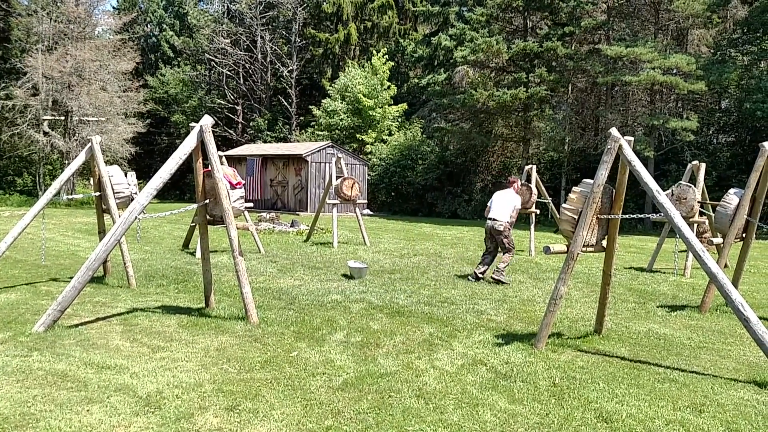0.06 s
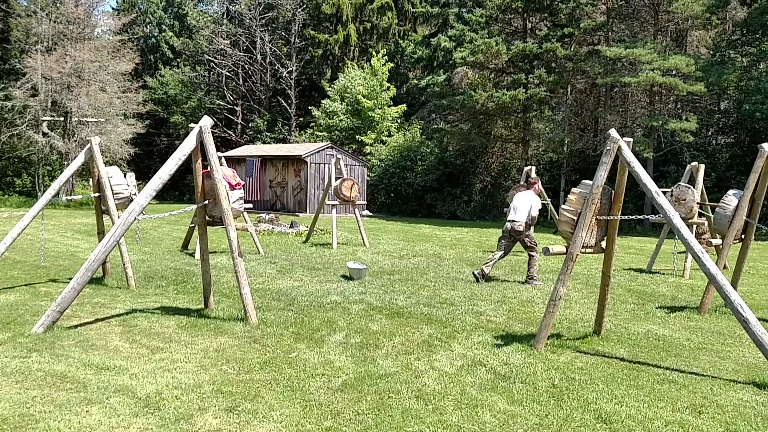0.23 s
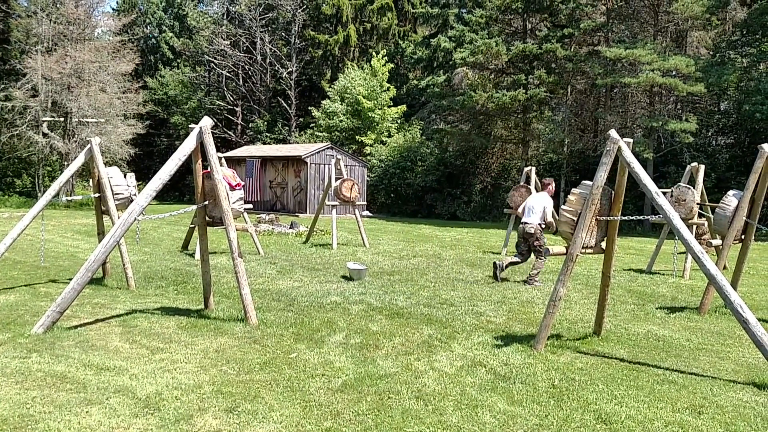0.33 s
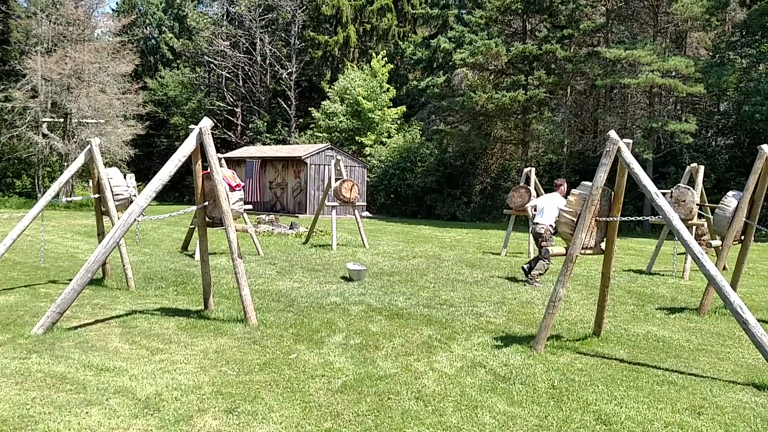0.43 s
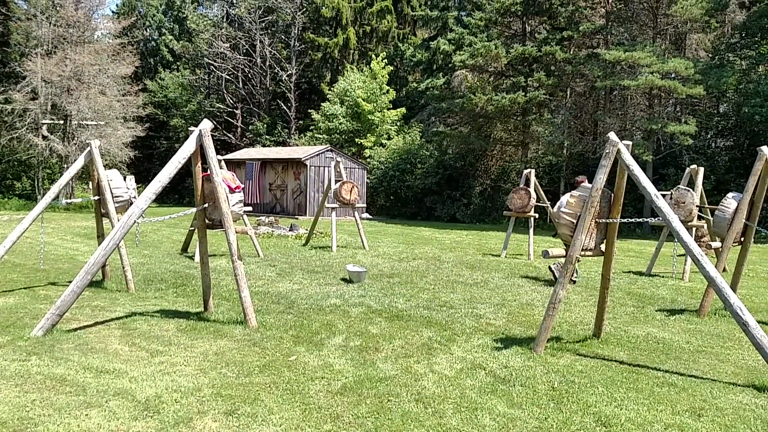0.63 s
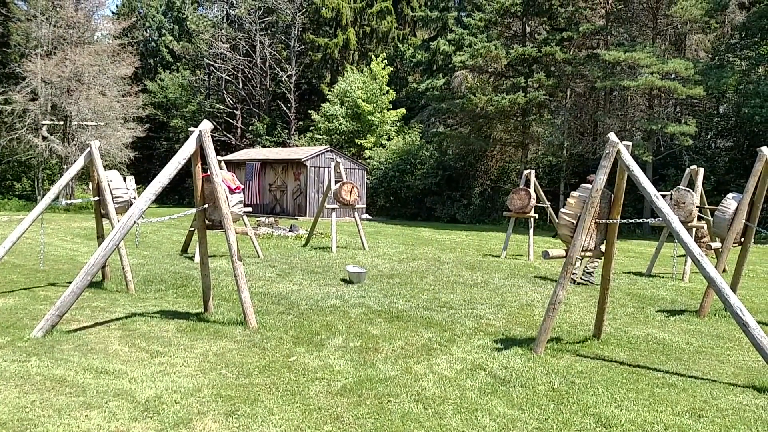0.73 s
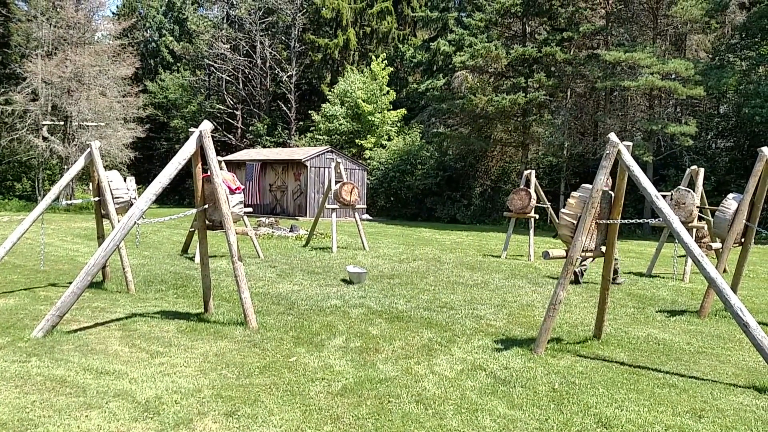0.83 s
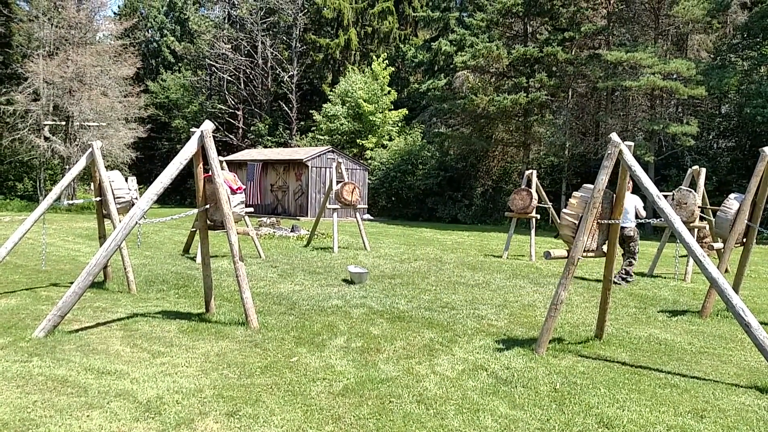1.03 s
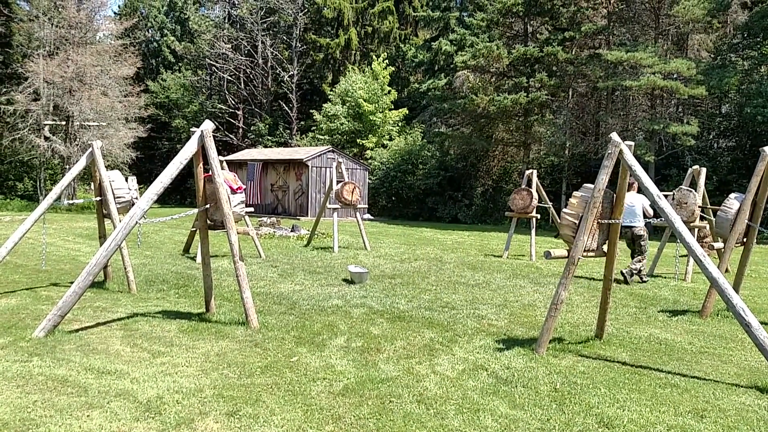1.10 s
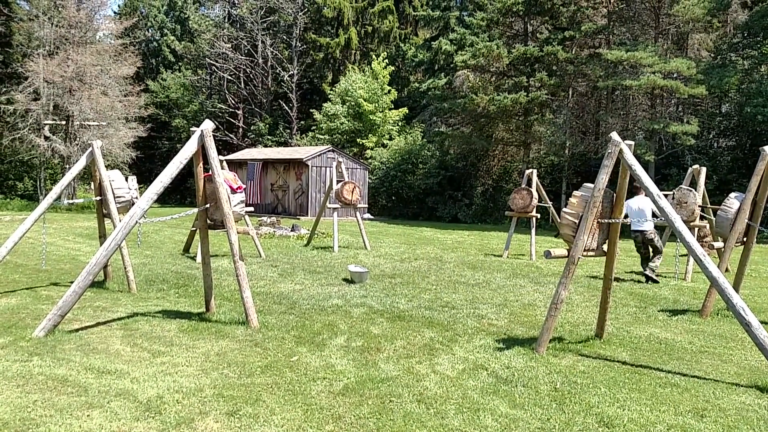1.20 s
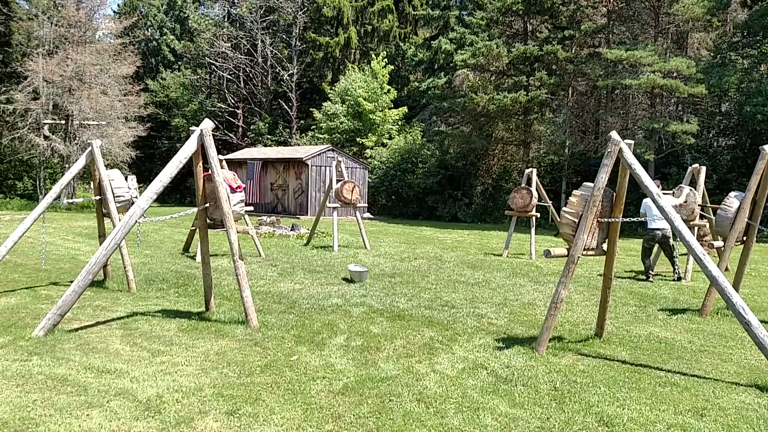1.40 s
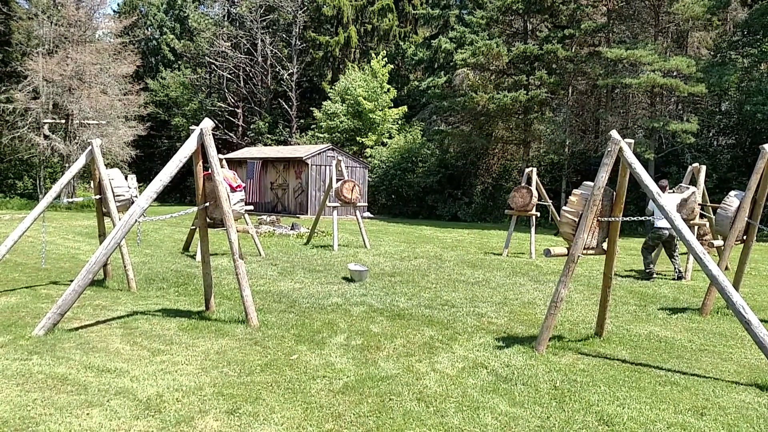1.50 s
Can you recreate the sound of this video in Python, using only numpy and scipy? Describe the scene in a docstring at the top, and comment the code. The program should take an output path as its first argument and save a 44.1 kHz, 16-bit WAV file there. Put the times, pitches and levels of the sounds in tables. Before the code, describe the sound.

Single crisp axe hit on wood in a grassy yard beside woods, splintery and short with a light scattered tail, then a softer low thud; quiet breeze, low rumble and thin insect hiss, distant single-channel microphone.

```python
"""Breeze, far rumble and a thin insect hiss run throughout, as random noise shaped in bands.
A thrown axe bites into a log round some metres away: quick pushes ring the wood's modes, with an edge tick and a snap.
Splintering fibres and then the rattling handle ring the same modes in short noise bursts.
Posts, a shed and trees return the blow as echoes and a scattered tail, by convolution with an impulse response.
Later dull knocks, each a brief swing of pressure: first a faint, inverted far echo of the blow, then low thuds."""
import sys
import numpy as np
from scipy import signal
from scipy.fft import rfft, irfft, next_fast_len
from scipy.io import wavfile
from scipy.ndimage import uniform_filter1d

SR = 44100
rng = np.random.default_rng(int(sys.argv[2]) if len(sys.argv) > 2 else 0)


def wav_out(sig):
    """Save sig, one row per channel (or a flat mono array), as 16-bit PCM at SR to the path in sys.argv[1]."""
    wavfile.write(sys.argv[1], SR, np.round(np.clip(np.atleast_2d(sig).T, -1, 1) * 32767).astype(np.int16))


def nominal_scale(level):
    """Amplitude ratio for a level in decibels (scalar or array-like)."""
    x = np.asarray(level, float) / 20
    return 10 ** x


N = 68355
T = np.arange(N) / SR  # seconds


def convolve(a, b):
    """Linear superposition: convolution by way of spectra, cut to the scene's length."""
    size = next_fast_len(2 * N)
    return irfft(rfft(a, size) * rfft(b, size), size)[:N]


def band(x, hz, octaves):
    """Zero-phase filtering by a bell-shaped gain on a log-frequency axis."""
    f = np.fft.rfftfreq(len(x), 1 / SR) + 1
    gain = np.exp(-2 * (np.log2(f / hz) / octaves) ** 2)
    return irfft(rfft(x) * gain, len(x))


def fade(start, t60):
    """Exponential decay, falling 60 dB in t60 seconds; silent before start."""
    return (T >= start) * np.exp(-np.log(1000) * np.maximum(T - start, 0) / t60)


def rise_and_fade(start, rise, t60):
    """Exponential build-up with time constant rise (s), multiplied by an exponential decay."""
    return fade(start, t60) * (1 - fade(start, rise * np.log(1000)))


def unit(x):
    """Energy normalisation: the squares sum to 1."""
    return x / np.sqrt(np.sum(x ** 2))


def walk(rate):
    """Slow random modulation: levels held 1 / rate seconds, smoothed twice, standard deviation 1."""
    k = int(SR / rate)
    held = np.repeat(rng.standard_normal(N // k + 1), k)
    smooth = uniform_filter1d(uniform_filter1d(held, k), k)[:N]
    return smooth / np.std(smooth)


def air():
    """Broadband noise of breeze and rumble: half-octave bands swell together, and flicker more at the low end."""
    # Spectrum of the breeze and rumble. Each row: frequency in Hz, relative density in dB per Hz.
    spectrum = np.array([(2.9, -51), (5.0, 0.5), (21, 0.5), (43, -9.5), (71, -3), (107, -7.5), (144, -2),
                         (195, -8), (231, -7.5), (518, -16.5), (751, -20), (1570, -26), (6680, -40),
                         (10300, -44), (15500, -45)])
    level_db, swell_db, swell_hz = -54, 0.78, 0.68
    flicker_db, flicker_hz, steady_above_hz = 1.06, 20.45, 2600
    f = np.fft.rfftfreq(N, 1 / SR) + 1
    density_db = np.interp(np.log(f), np.log(spectrum[:, 0]), spectrum[:, 1])
    noise = irfft(rfft(rng.standard_normal(N)) * nominal_scale(density_db), N)
    swell = swell_db * walk(swell_hz)
    out = 0
    for hz in 5 * 2 ** np.arange(0, 12.1, .5):
        flicker = flicker_db * walk(flicker_hz) / (1 + hz / steady_above_hz)
        out = out + nominal_scale(swell + flicker) * band(noise, hz, 0.97)
    return out * nominal_scale(level_db) / np.sqrt(np.mean(out ** 2))


def insects():
    """Amplitude-modulated narrow-band noise: a far, thin insect hiss that flickers unevenly."""
    centre_hz, octaves, level_db = 10360, .17, -83
    flicker_db, flicker_hz = 3, 45.4
    hiss = band(rng.standard_normal(N), centre_hz, octaves) * nominal_scale(flicker_db * walk(flicker_hz))
    return nominal_scale(level_db) * hiss / np.std(hiss)


def blade_pushes():
    """Impulsive excitation: the blade goes in by jerks, and a longer push is a duller force."""
    # Jerks of the blade. Each row: start in seconds, level in dB, time constant in ms, direction (+1 or -1).
    pushes = [(0.2195, -5, 0.43, 1), (0.2222, 3, 0.21, -1), (0.2259, -8, 0.15, 1)]
    force = 0
    for start, db, ms, way in pushes:
        tau = ms / 1000
        u = np.maximum(T - start, 0) / tau
        push = u ** 2 / 2 * np.exp(-u) / (tau * SR)  # samples sum to about 1
        force = force + way * nominal_scale(db) * push
    return force


def log_ring(force):
    """Modal synthesis: the force is convolved with decaying sines, then limited at both ends of the spectrum."""
    # Modes of the log round. Each row: frequency in Hz, level in dB, 60 dB decay time in seconds.
    modes = [(129, -20.5, 0.027), (200, -37.5, 0.086), (231, -22, 0.07), (340.2, -16.5, 0.018),
             (561, -28.5, 0.041), (745, -20.5, 0.011), (921, -24, .026), (1130, -20, 0.014),
             (1650, -19.5, 0.014), (2055, -21, 0.0094), (2187, -27, 0.029), (2380, -35.5, 0.021),
             (2740, -28, 0.0088), (2990, -20, 0.013), (3320, -41, 0.0056), (3700, -45, 0.06),
             (4360, -32, 0.012)]
    radiates_above_hz, dull_above_hz = 123, 5000
    ring = sum(nominal_scale(db) * np.sin(2 * np.pi * hz * T) * fade(0, t60) for hz, db, t60 in modes)
    wood = convolve(force, ring)
    wood = signal.sosfilt(signal.butter(2, radiates_above_hz, "high", fs=SR, output="sos"), wood)
    return signal.sosfilt(signal.butter(4, dull_above_hz, fs=SR, output="sos"), wood)


def edge_tick():
    """Damped oscillation: the touching edge sounds one high sine that rises and dies quickly."""
    start_s, hz, level_db = .2197, 5820, -46
    rise_s, t60_s = 0.001, 0.013
    return nominal_scale(level_db) * np.sin(2 * np.pi * hz * (T - start_s)) * rise_and_fade(start_s, rise_s, t60_s)


def crack():
    """Decaying band noise: the airborne snap starts at once and dies exponentially."""
    start_s, centre_hz, octaves = .2202, 7000, 1.0
    noise_db, t60_s = -56.5, 0.065  # the level is that of the noise before its band filter
    return nominal_scale(noise_db) * band(rng.standard_normal(N), centre_hz, octaves) * fade(start_s, t60_s)


def splinters():
    """Random impulsive excitation: one-sided noise bursts stand for tiny jerks of fibres, then handle rattle."""
    # Bursts of force. Each row: start in seconds, level in dB before the band filter,
    # 60 dB decay time in seconds, centre in Hz, width in octaves.
    bursts = [(.2204, -30, 0.00061, 2500, 2.5), (.2225, -10, 0.0013, 1660, 0.63),
              (.2229, -13, 0.00094, 3100, 0.93), (.2230, -12.5, .001, 717, 0.86),
              (.2238, -15, 0.0012, 990, 0.85), (0.2255, -8.5, 0.00069, 2140, 0.84),
              (.2270, -8.5, 0.00098, 2950, 1.1), (.2325, -22, 0.0012, 2200, 1.45),
              (.2400, -30, 0.0025, 3260, 1.1), (0.247, -34, 0.001, 3220, 1.8),
              (.2612, -24.5, .0015, 2600, 1.5), (.2678, -32, 0.001, 1930, 0.62),
              (.2738, -23.5, .002, 3500, 0.49), (.2843, -28.5, 0.00079, 600, 0.79),
              (0.2875, -21.5, 0.0013, 1120, 1.1), (0.2888, -23.5, .001, 560, 0.72),
              (.2905, -20, .002, 3850, 0.36), (.2952, -26, .001, 1300, 0.85)]
    force = 0
    for start, db, t60, hz, octaves in bursts:
        jerks = unit(np.abs(rng.standard_normal(N)) * fade(start, t60))
        force = force + nominal_scale(db) * band(jerks, hz, octaves)
    return force


def blow():
    """Superposition: pushes and splinters drive the same log, and tick and crack add to its ring."""
    wood = log_ring(blade_pushes() + splinters())
    return wood + edge_tick() + crack()


def surroundings():
    """Impulse response of the place: direct path, echoes smeared by rough faces, and a scattered tail."""
    # Echoes off posts, shed and trees. Each row: delay in seconds, level in dB before the band filter,
    # centre in Hz, width in octaves, smear time constant in ms.
    echoes = [(.0215, -17, 237, 0.98, 0.11), (0.0658, -25.5, 271, 0.74, 1.8), (.086, -31, 220, 1.8, 0.9),
              (0.168, -32.5, 173, 0.95, 0.39)]
    # Scattering by early clutter and far trees. Each row: delay in seconds, rise time constant in seconds,
    # 60 dB decay time in seconds, level in dB before the band filter, centre in Hz, width in octaves.
    scatter = [(0.0027, 0.0048, 0.24, -13, 1400, 5), (0.0095, 0.0077, 0.27, -3.5, 4700, 0.47),
               (0.064, 0.025, 0.75, -19, 1300, 2.4), (0.093, 0.009, 1.04, -16.5, 1680, 0.24),
               (0.065, 0.024, 1.1, -22, 2100, 0.44), (0.027, 0.01, 0.49, -1, 1350, 0.17),
               (0.094, 0.041, .7, -10, 4500, 0.44), (0.05, 0.0073, .4, -20, 430, 0.93),
               (0.043, 0.021, 0.53, -14, 148, 0.5)]
    out = (np.arange(N) == 0) * 1.  # direct path
    for delay, db, hz, octaves, ms in echoes:
        smear = fade(delay, ms / 1000 * np.log(1000))
        face = unit(np.abs(rng.standard_normal(N)) ** 3 * smear)  # cubing favours a few strong reflections
        out = out + nominal_scale(db) * band(face, hz, octaves)
    for delay, rise, t60, db, hz, octaves in scatter:
        tail = unit(rng.standard_normal(N) * rise_and_fade(delay, rise, t60))
        out = out + nominal_scale(db) * band(tail, hz, octaves)
    return out


def knocks():
    """Gaussian-windowed oscillation: each soft swing of pressure is sharpened by a second harmonic."""
    # A faint, inverted far echo of the blow, then low thuds. Each row: centre in seconds,
    # level of the fundamental in dB, frequency in Hz, standard deviation of the swell in cycles,
    # direction (+1 or -1).
    thuds = [(0.5671, -43, 225, 0.45, -1), (0.7526, -28, 186, 0.41, 1), (0.8188, -43.5, 169, 0.23, 1)]
    lean_rad, harmonic_db = 0.54, -14.5  # phase at the centre; second harmonic against the fundamental
    out = 0
    for centre, db, hz, cycles, way in thuds:
        phase = 2 * np.pi * hz * (T - centre) + lean_rad
        swing = np.sin(phase) + nominal_scale(harmonic_db) * np.sin(2 * phase)
        swell = np.exp(-.5 * ((T - centre) * hz / cycles) ** 2)
        out = out + way * nominal_scale(db) * swing * swell
    return out


def scene():
    """Superposition of air, insects, the blow in its surroundings, and the knocks, in one channel."""
    blow_in_place = convolve(blow(), surroundings())
    return (air() + insects() + blow_in_place + knocks())[None]


def low_pass(x):
    """Removes everything above the highest recorded frequency."""
    return signal.sosfilt(signal.butter(12, 15640, fs=SR, output="sos"), x)


def record(dry):
    """Identity up to the last stage: the mix goes on at unchanged level."""
    return low_pass(dry)


dry = scene()
out = record(dry)
wav_out(out)
```